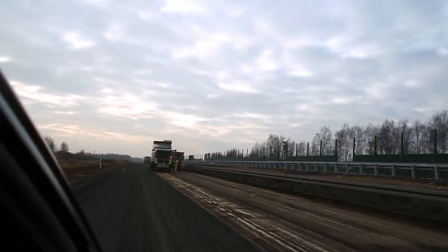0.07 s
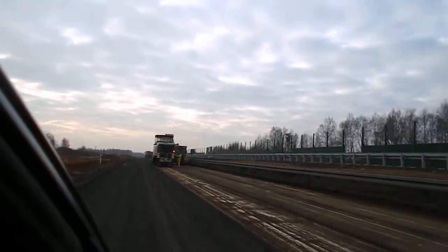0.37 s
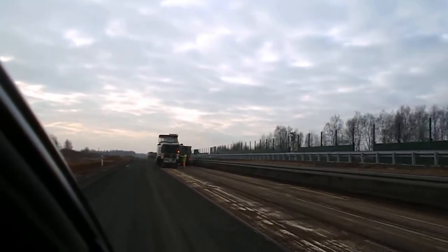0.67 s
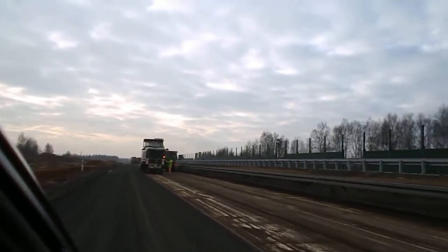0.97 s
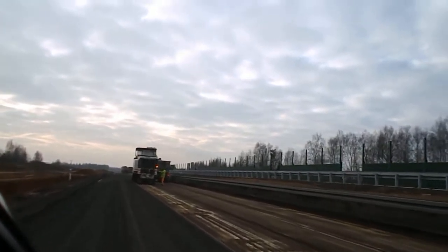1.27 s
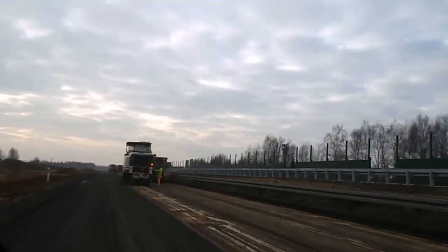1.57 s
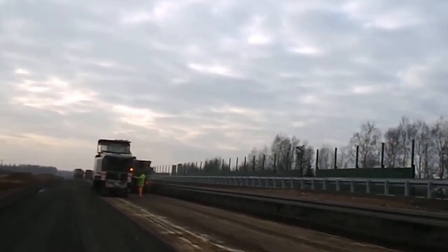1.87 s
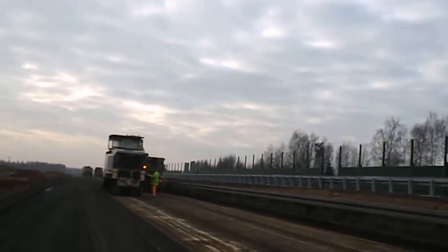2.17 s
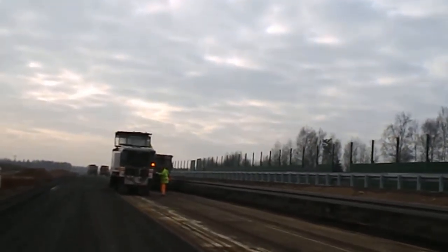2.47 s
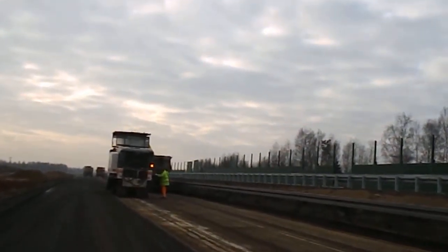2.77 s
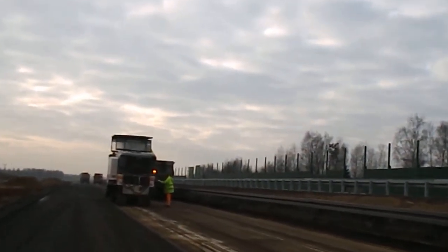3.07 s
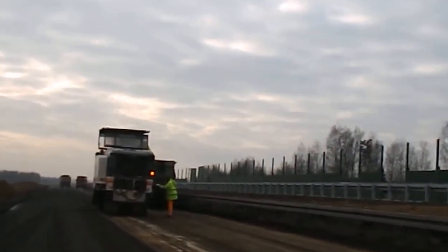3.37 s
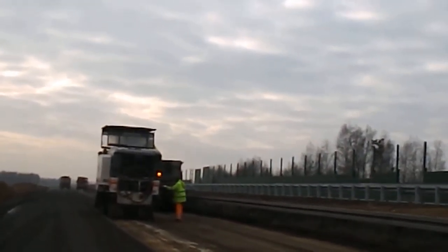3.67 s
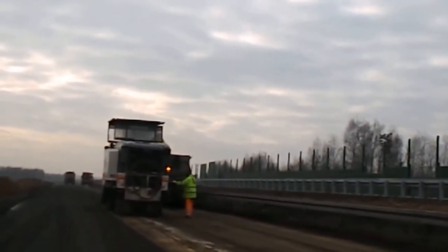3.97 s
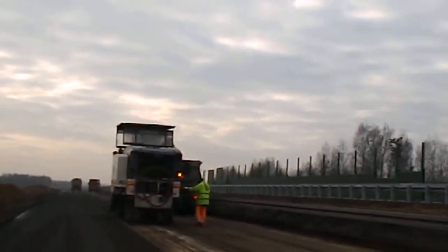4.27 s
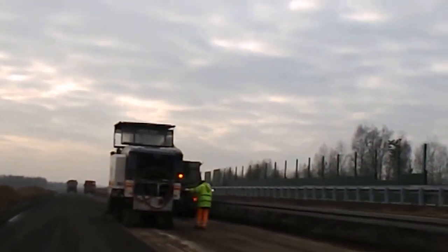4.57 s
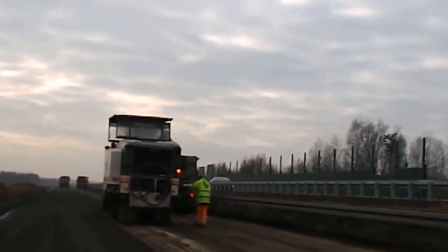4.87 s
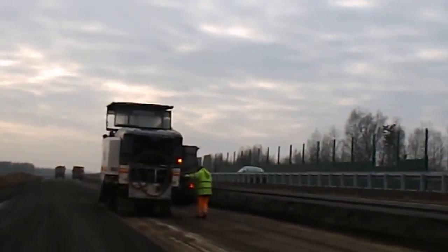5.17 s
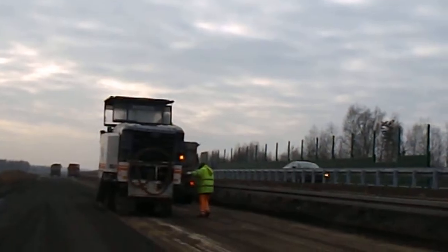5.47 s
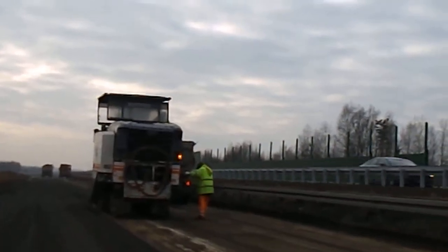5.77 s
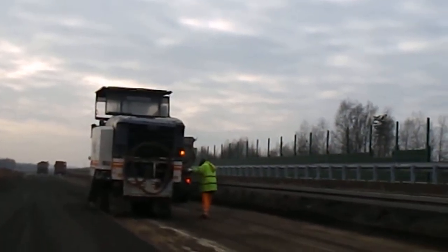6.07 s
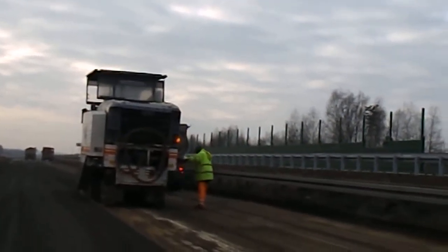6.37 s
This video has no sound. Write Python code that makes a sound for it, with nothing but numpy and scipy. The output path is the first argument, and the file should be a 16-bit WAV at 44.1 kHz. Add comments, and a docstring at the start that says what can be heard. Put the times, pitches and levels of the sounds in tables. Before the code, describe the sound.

Wind slaps and crackles on a microphone held out of a moving vehicle's window, in quick, irregular buffets. About halfway through, the vehicle slows and the wind eases to softer airflow with occasional thumps. A large road milling machine ahead grows from far off into a steady diesel drone and hissing roar, its crawler tracks squealing faintly as it draws near.

```python
"""Roadside approach to a road milling machine, camera microphone held out of a vehicle's window.
After half a second of silence, 140 m off, wind slaps the microphone in quick buffets that duck the limiter.
From about 3 s the vehicle slows and the wind lets go, leaning on the limiter in slow swells instead.
The machine's diesel drone and hissing roar grow with its nearness, and its tracks squeal faintly.
By 5 s it stands about 15 m from the microphone."""
import sys
import numpy as np
from scipy import signal
from scipy.fft import rfft, irfft
from scipy.io import wavfile
from scipy.ndimage import uniform_filter1d, map_coordinates

SR = 44100
rng = np.random.default_rng(int(sys.argv[2]) if len(sys.argv) > 2 else 0)


def generate_wav(sig):
    """Save sig (samples, or channels by samples) to the path in sys.argv[1] as 16-bit PCM at SR."""
    pcm = np.round(np.clip(np.atleast_2d(sig).T, -1, 1) * 32767).astype(np.int16)
    wavfile.write(sys.argv[1], SR, pcm)


N = 283122
T = np.arange(N) / SR
FREQS = np.fft.rfftfreq(N, 1 / SR)
START_S, EDDY_HZ = .535, 400  # the sound opens; eddy rate that EDDY_SPECTRUM holds for

# hardest wind buffets on the microphone: (time [s], level [dB], build-up [s])
HARD_BUFFETS = [(.589, 7.5, 0.0018), (.701, -3.5, 0.0011), (.748, -6.5, 0.0038), (.783, 5, 0.0032),
                (.805, -4, 0.015), (.834, -9, 0.0062), (.9, -13.5, 0.012), (.932, -6, 0.003),
                (1.004, -11.5, 0.0029), (1.033, -5, 0.0019), (1.048, -7.5, 0.0052), (1.135, -0.5, 0.0041),
                (1.215, -5, 0.00097), (1.272, -3, .006), (1.315, -4, 0.0011), (1.331, -3, 0.0025),
                (1.361, 9.5, 0.00048), (1.415, -20, 0.0083), (1.431, -4, 0.0032), (1.514, -2, 0.0014),
                (1.608, 4.5, 0.0037), (1.641, -1, 0.0096), (1.672, -4, 0.0053), (1.757, -5.5, 0.0083),
                (1.802, -7.5, 0.0068), (1.849, -1, .0039), (1.881, 0.5, 0.0021), (1.974, -8, 0.014),
                (2.02, -3.5, 0.0015), (2.029, -1.5, 0.003), (2.181, -8.5, 0.0073), (2.204, -8, 0.012),
                (2.272, -7, 0.004), (2.312, -3.5, 0.0018), (2.356, -4.5, 0.0036), (2.418, -6, 0.0021),
                (2.479, -1.5, 0.0027), (2.507, -5, 0.0087), (2.602, 0.5, 0.0024), (2.632, 3, 0.0024),
                (2.683, -2.5, 0.0091), (2.777, 4, 0.0027), (2.837, -2, 0.0011), (2.858, 1, 0.0033),
                (2.884, 0, 0.0019), (2.941, 10, 0.00082), (2.975, -2, 0.011), (3.032, 6, 0.0027),
                (3.082, 2.5, 0.0016), (3.115, 4.5, 0.0028), (3.571, -3, 0.0075), (4.331, 1.5, .0035),
                (4.387, -4.5, 0.0057), (4.488, 9, 0.0018), (4.569, -4.5, 0.0067), (4.693, -6, 0.00765),
                (5.724, -3.5, 0.0064)]
# slow swells of air pressure: (time [s], level [dB], half-width [s])
PRESSURE_SWELLS = [(3.5, -4.5, 0.01), (3.6, -8.5, 0.062), (3.871, -8.5, 0.029), (4.16, -8.5, 0.019),
                   (4.368, -11.5, 0.078), (4.58, -8, 0.03), (5.032, -10.5, 0.022), (5.68, -14, 0.062),
                   (6.002, -10, .04)]
# airflow past the window: (time [s], level [dB])
AIRFLOW = [(.535, -21), (.62, -20), (.82, -14), (.97, -24), (1.15, -16), (1.65, -16), (1.97, -18),
           (2.12, -27), (2.4, -19), (3.05, -16), (3.25, -22), (3.7, -23), (4.15, -30), (4.35, -21),
           (4.72, -23.5), (4.85, -29.5), (6.42, -28)]
# eddies pass more slowly as the vehicle brakes: (time [s], eddy rate [Hz])
EDDY_PASSING = [(.5, 430), (.8, 501), (1.2, 441.6), (1.65, 543), (2.1, 369.8), (2.95, 400), (3.1, 296.7),
                (6.42, 311)]
# pressure spectrum of the turbulence: (frequency [Hz], level [dB])
EDDY_SPECTRUM = [(20, -17), (70, -11.5), (140, 2), (300, 2.5), (500, 0), (850, -7), (1400, -17.5),
                 (2500, -33.5), (5000, -47.5), (12000, -127)]
# cracks where a buffet's crest outruns the limiter: (time [s], level [dB], ring [Hz])
CREST_CRACKS = [(0.59, -28, 1780), (0.9306, -6.5, 1540), (1.135, -15, 1600), (1.431, -20, 2790),
                (1.441, -28, 4200), (1.618, -29, 2820), (1.672, -14.5, 2660), (2.268, -12, 700),
                (2.478, -18, 1600), (2.939, -17, 2420)]
# microphone to machine: (time [s], distance [m])
MACHINE_DISTANCE = [(.5, 140), (1.3, 90), (2.2, 42), (3.3, 26.8), (4.9, 14.75), (6.42, 16.5)]
# spectrum of fans, conveyor and cutting drum together: (frequency [Hz], level [dB])
RUSH_SPECTRUM = [(25, -10), (60, -41.5), (120, -3), (250, 3), (400, 3), (600, -3), (1100, 1), (1800, -4),
                 (2600, -5), (3400, -4), (5000, -7.5), (6300, -18), (7700, -25), (9300, -23.5),
                 (11000, -19)]
# ringing of the machine's housing: (frequency [Hz], width [Hz], level in the roar [dB])
HOUSING_MODES = [(167, 27, -10), (245, 17, -17.5), (1103, 47, -25), (2150, 25, -22), (3140, 330, -21)]
# diesel speed: (time [s], firing rate [Hz])
FIRING_RATE = [(.5, 110), (3.4, 89.4), (3.75, 85), (4.1, 85.4), (5.0, 87.1), (5.7, 91), (6.42, 93)]
# lines of the diesel: (multiple of the firing rate, level in the roar [dB])
DIESEL_LINES = [(1, -13), (2, -23), (3, -29)]
# hum of the drive: (time [s], level in the roar [dB])
DRIVE_HUM = [(.5, -28), (3.4, -12), (5.4, -14.5), (6.42, -35)]
# squeals of the crawler tracks: (time [s], length [s], pitch [Hz], level in the roar [dB])
TRACK_SQUEALS = [(2.9, 0.26, 4770, -17), (3.762, 0.065, 5350, -14), (3.98, .16, 4970, -18.5),
                 (4.142, 0.074, 5170, -14), (4.22, 0.13, 4810, -17)]
# dips in the camera's treble: (frequency [Hz])
TREBLE_NOTCHES = [7000, 8550, 10000]


def buffets(collapse=1.72):
    """Wind on the microphone: each buffet builds, brightens towards its crest and collapses quickly."""
    eddies, out = turbulence(evenness=0.93), np.zeros(N)
    for s, db, build in [*HARD_BUFFETS, *flurry()]:
        span = slice(max(int((s - 3 * build) * SR), 0), int((s + 2 * build) * SR))
        age = (T[span] - s) / build
        shape = np.exp(-np.where(age > 0, collapse * age, age) ** 2 / 2)
        speed = curve(EDDY_PASSING, s) / EDDY_HZ * (.8 + 0.2504 * shape)
        out[span] += amp(db) * shape * sweep(eddies, span.start, speed)
    return out


def flurry(count=110, above_db=6, spread_db=5.5, build_s=0.00304, calm_db=-24, stormy_db=-17):
    """Rows of lesser buffets at random, more frequent and harder in strong airflow."""
    when, chance, strength, length = rng.random((count, 4)).T
    s = START_S + (T[-1] - START_S) * (np.arange(count) + when) / count
    air_db = curve(AIRFLOW, s)
    level_db = air_db + above_db + spread_db * (2 * strength - 1)
    rows = np.c_[s, level_db, build_s * 2 ** (length - .5)]
    return rows[chance * (stormy_db - calm_db) < air_db - calm_db]


def turbulence(evenness):
    """A frozen train of eddies; evenness levels out their strength."""
    eddies = noise(colour(EDDY_SPECTRUM))
    power = uniform_filter1d(uniform_filter1d(eddies ** 2, size=170), size=170)
    return unit(eddies / (power + 1e-9) ** (evenness / 2))


def sweep(eddies, start, speed):
    """Carries the eddies past the microphone: faster air sounds higher."""
    return map_coordinates(eddies, [(start + np.cumsum(speed)) % (N - 1)], order=1)


def breeze(flutter_db=2.5, full_db=-15, octaves_per_db=0.103):
    """Airflow flutters past the window, duller as it weakens."""
    level_db = curve(AIRFLOW) + flutter_db * wander(rate_hz=45)
    speed = 2 ** (octaves_per_db * np.clip(level_db - full_db, -14, 5))
    return amp(level_db) * sweep(turbulence(evenness=0.23), 0, speed)


def crackle(wind, per_s=260, spread_db=4.5, size_db=1, pitch_hz=1080):
    """Small eddies snap on the microphone's port, as hard as the wind blows just then."""
    force = np.sqrt(abs(uniform_filter1d(wind ** 2, size=500)))
    # light air hardly snaps, hard air no harder
    force = 0.27 * np.tanh(force * force / (force + 0.081) / 0.36)
    out, t = np.zeros(N), np.arange(-128, 128) / SR
    for hz in pitch_hz * np.geomspace(.45, 1.5, num=4):
        sizes = amp(size_db + spread_db * np.minimum(rng.exponential(1, N), 3))
        hits = rng.choice([-1, 1], N) * sizes * (rng.random(N) < per_s / 4 / SR)
        phase = 2 * np.pi * hz * t
        snap = np.exp(-(phase / 1.78) ** 2) * np.sin(phase)
        out += signal.oaconvolve(hits, snap, "same")
    return force * out


def cracks(ring_s=0.001, snap_s=0.00054, snap_db=-1, ring_db=1):
    """A bright snap and a very short ring where a buffet's crest outruns the limiter."""
    out, t = np.zeros(N), np.arange(256) / SR
    snap = amp(snap_db) * np.exp(-t / snap_s)
    ring = amp(ring_db) * np.exp(-t / ring_s)
    for s, db, hz in CREST_CRACKS:
        out[round(s * SR):][:len(t)] += amp(db) * (snap + ring * np.sin(2 * np.pi * hz * t))
    return out


def swells(unrest=.08):
    """Humps of air pressure, heard mostly as the limiter ducks, with a little rumble on top."""
    humps = sum(amp(db) * np.exp(-((T - s) / width) ** 2 / 2) for s, db, width in PRESSURE_SWELLS)
    return humps * (1 + unrest * wander(rate_hz=30))


def milling_machine(roar_db=5, throb=0.1, rattle_db=1.7, hum_ratio=4.6):
    """The roar at 1 m: diesel, a rush throbbing with the firing, ringing housing, drive hum, tracks."""
    firings = np.cumsum(curve(FIRING_RATE) * (1 + 0.00792 * wander(rate_hz=6.6))) / SR
    drone = diesel(firings)
    rush = noise(colour(RUSH_SPECTRUM)) * (1 + throb * np.sin(2 * np.pi * firings))
    rush *= amp(-2.5 + rattle_db * wander(rate_hz=24.6))
    housing = sum(amp(db) * noise(1 / (1 + (2 * (FREQS - hz) / width) ** 2))
                  for hz, width, db in HOUSING_MODES)
    hum = amp(curve(DRIVE_HUM)) * tone(hum_ratio * firings, shake=0.39, shake_hz=6.8)
    return amp(roar_db) * (drone + rush + housing + hum + track_squeals())


def diesel(firings, waver_db=1.8):
    """The engine drones on multiples of its firing rate, each wavering in level."""
    out = np.zeros(N)
    for multiple, db in DIESEL_LINES:
        peak = amp(db + waver_db * wander(rate_hz=7.8)) * np.sqrt(2)
        out += peak * np.sin(2 * np.pi * (multiple * firings + rng.random()))
    return out


def track_squeals(waver=0.0082):
    """Each faint squeal of the crawler tracks swells and fades on one unsteady pitch."""
    out = np.zeros(N)
    clock = np.cumsum(1 + waver * wander(rate_hz=120)) / SR
    for s, length, hz, db in TRACK_SQUEALS:
        arch = np.sqrt(abs(np.sin(np.pi * np.clip((T - s) / length, 0, 1))))
        out += amp(db) * arch * tone(hz * clock, shake=0.74, shake_hz=30)
    return out


def afar(sound, treble_hz=7500, loss_db_per_m=0.09):
    """Sound spreads and loses treble to the air between machine and microphone."""
    distance = curve(MACHINE_DISTANCE)
    dull = irfft(rfft(sound) / (1 + (FREQS / treble_hz) ** 6), N)
    return (dull + (sound - dull) * amp(-loss_db_per_m * distance)) / distance


def amp(db):
    """Decibels to gain."""
    return 10 ** (np.asarray(db) / 20)


def unit(x):
    """Scales to rms 1."""
    return x / np.sqrt(np.mean(x ** 2) + 1e-20)


def curve(rows, s=T):
    """A timed table read at the given times."""
    return np.interp(s, *np.transpose(rows))


def colour(points):
    """Gain at every frequency from (frequency [Hz], level [dB]) points."""
    hz, db = np.transpose(points)
    return amp(np.interp(np.log(FREQS + 1), np.log(hz), db))


def noise(gain):
    """Noise of rms 1 with the given spectrum."""
    return unit(irfft(rfft(rng.standard_normal(N)) * gain, N))


def wander(rate_hz, size=4096):
    """Random drift, up to about the given rate."""
    hz = np.fft.rfftfreq(size, T[-1] / size)
    slow = irfft(rfft(rng.standard_normal(size)) / (1 + (hz / rate_hz) ** 4))
    return np.interp(T, np.linspace(0, T[-1], size), unit(slow))


def tone(turns, shake, shake_hz):
    """A sine whose strength shakes."""
    return unit(1 + shake * wander(shake_hz)) * np.sqrt(2) * np.sin(2 * np.pi * turns)


def limiter_gain(pressure, threshold_db=-15.0, strength=0.94, recovery_db_per_s=180):
    """Clamps just after a buffet's crest, which slips through, and lets the sound swell back."""
    power_db = 10 * np.log10(signal.lfilter(np.ones(110) / 110, 1, pressure ** 2) + 1e-12)
    recovery_db = recovery_db_per_s * T
    held_db = np.maximum.accumulate(power_db + recovery_db) - recovery_db
    over_db = np.maximum(held_db - threshold_db, 0)
    return amp(-strength * uniform_filter1d(over_db, size=24))


def scene(port_hz=75):
    """One microphone, wind right on it, machine down the road; its port thins the eddies' bass."""
    wind = irfft(rfft(buffets() + breeze()) * FREQS / np.hypot(FREQS, port_hz), N)
    return (wind + crackle(wind) + swells() + afar(milling_machine()))[None]


def record(dry, low_cut_hz=30, ceiling=.78, notch_width_hz=420, high_cut_hz=11296):
    """The camera trims deep bass, limits, cracks on some crests and cuts the treble with a ripple."""
    pressure = dry[0]
    low_cut = FREQS ** 3 / np.hypot(FREQS ** 3, low_cut_hz ** 3)
    x = irfft(rfft(pressure) * low_cut, N)
    x *= limiter_gain(pressure)  # the limiter feels the untrimmed swells
    x /= (1 + (x / ceiling) ** 4) ** .25  # peaks round off
    x += cracks()
    x *= np.clip((T - START_S) / .002, 0, 1)  # 2 ms fade-in
    ripple = np.prod([np.tanh(abs(FREQS - hz) / notch_width_hz) for hz in TREBLE_NOTCHES], axis=0)
    high_cut = 1 / np.sqrt(1 + (FREQS / high_cut_hz) ** 160)
    return (irfft(rfft(x) * ripple * high_cut, N) * (T > START_S))[None]


dry = scene()
out = record(dry)
generate_wav(out)
```